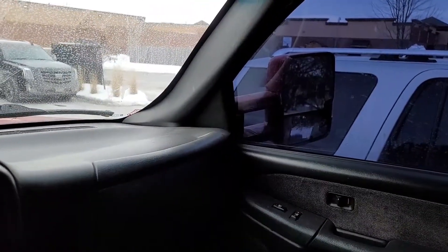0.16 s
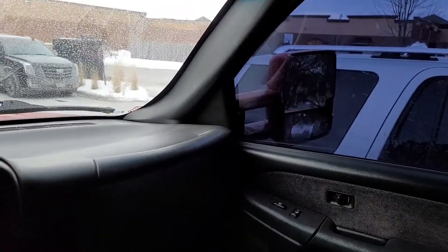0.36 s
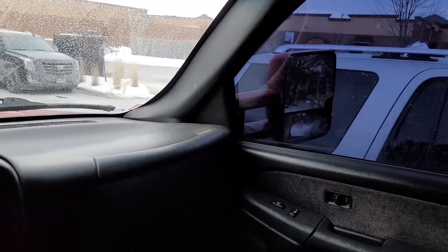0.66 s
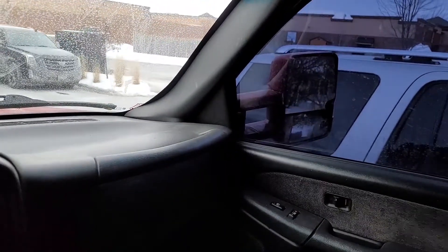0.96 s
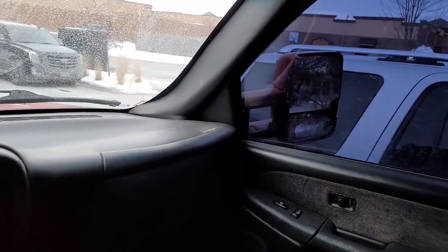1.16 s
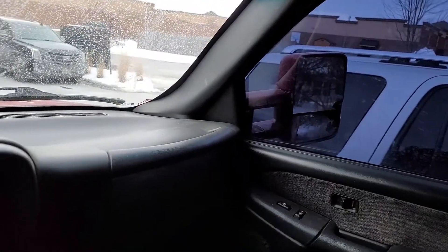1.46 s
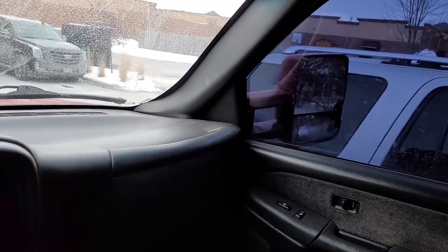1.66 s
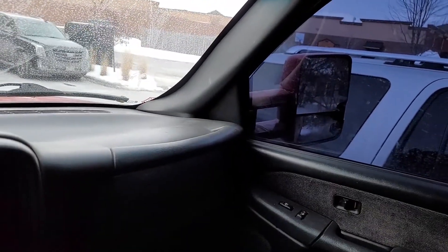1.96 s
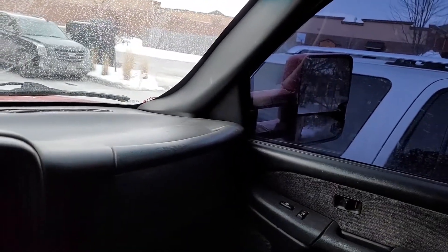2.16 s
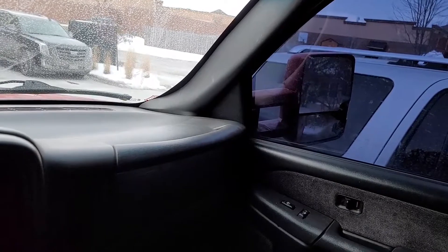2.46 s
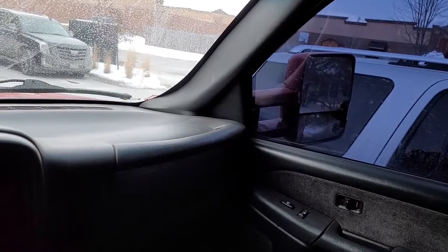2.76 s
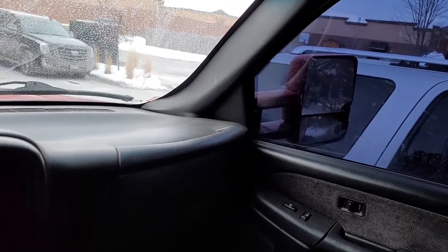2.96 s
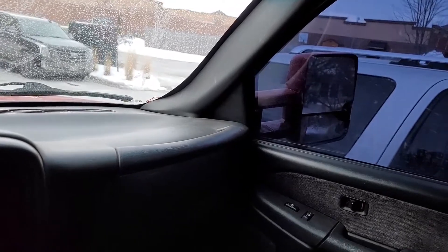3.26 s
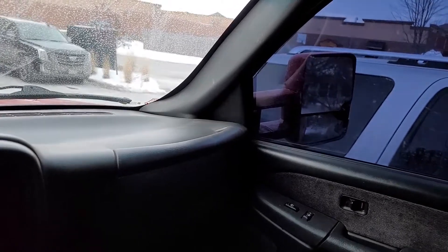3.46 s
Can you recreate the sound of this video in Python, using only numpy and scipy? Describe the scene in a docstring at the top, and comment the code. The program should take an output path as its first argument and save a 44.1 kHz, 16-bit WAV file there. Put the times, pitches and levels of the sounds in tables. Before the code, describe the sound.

A cold diesel truck engine, heard inside the cab, fires with a low boom at 0.2 seconds, then sags until 0.8 with faint chirping squeaks. Uneven thudding bursts follow near 1.0, 1.4, 1.9 and 2.5, with hard knocks, clatter and cab rumble. Another small squeak comes at 2.8. From 3.0 it catches, rising into a stronger, smoother drone; close bright clicks tick around 3.5.

```python
"""A cold diesel engine heard from inside the cab: it fires in stumbling bursts, sags, fires again and at last runs.
Throughout, low sines at orders of the firing rate make the exhaust boom, and noise bursts make the knocks.
Between knocks, noise pulsing with the firing makes the clatter, and slower noise the rumble of floor and cab.
As the engine sags, gliding harmonic tones squeak, with one more late on.
At the end, short bursts of bright noise click close by."""
import sys
import numpy as np
from scipy import signal
from scipy.fft import rfft, irfft, next_fast_len
from scipy.io import wavfile

SR = 44100
rng = np.random.default_rng(int(sys.argv[2]) if len(sys.argv) > 2 else 0)


def put_to_file(sound):
    """Save the sound as 16-bit audio at rate SR, in the file named by the first command-line argument."""
    columns = np.atleast_2d(sound).T  # one column per channel
    safe = np.clip(columns, -1, 1)
    whole_steps = np.round(safe * 32767)
    wavfile.write(sys.argv[1], SR, whole_steps.astype(np.int16))


N = 158760

# Exhaust boom over time: start_s, firing_rate_hz, first_order_db, second_order_db
ENGINE = [(0.0, 31.3, -38.5, -54), (0.1, 32.5, -33, -30.5), (0.2, 39.02, -11, -17), (0.27, 44.1, -16, -24),
          (0.3, 43.4, -18.5, -23), (0.4, 33, -35.5, -33.5), (0.49, 31.41, -40, -32),
          (0.83, 28.52, -42, -45), (0.92, 33.12, -34, -35.5), (1.0, 40.52, -16.5, -12),
          (1.08, 44, -15.5, -25.5), (1.2, 36.86, -31, -41.5), (1.25, 34.02, -32.5, -35),
          (1.4, 35.4, -19.5, -19), (1.44, 35.57, -27, -42.5), (1.63, 32.52, -20.5, -21),
          (1.66, 31.06, -25.5, -41), (1.79, 29.71, -28.5, -35), (1.92, 39.3, -15, -12),
          (1.96, 41.29, -20, -28), (2.05, 45.2, -20, -17), (2.18, 39.3, -32, -35),
          (2.26, 33.49, -22.5, -32), (2.3, 30.8, -17, -36), (2.34, 32.9, -28.5, -51.5),
          (2.46, 40.17, -18, -12.5), (2.55, 39.67, -18.5, -19), (2.6, 39.28, -15, -20),
          (2.71, 52.23, -16, -19), (2.74, 52.3, -18, -34), (2.9, 37, -30.5, -44.5), (3.0, 39.72, -18, -15),
          (3.1, 54.85, -12.5, -16.5), (3.2, 56.96, -8.5, -22), (3.28, 70.13, -12, -18.5),
          (3.52, 67.14, -15.5, -14.5), (3.6, 67.16, -15, -23.5)]
# Further exhaust orders: multiple_of_firing_rate, level_db (against the boom)
EXHAUST_ORDERS = [(0.751, -19), (1.248, -17), (1.753, -21), (2.5, -13.5), (2.998, -16.5)]
UNEVEN_DB, THUD_DB = 4, -1.5  # spread between firings; thudding against the boom; both while rough
SETTLES_HZ, SETTLED_SHARE = 55.6, 0.42  # firing rate midway to even running; roughness left above it
CAB_CUT_HZ = 132.4  # above this the cab no longer booms
# Spectrum of the loose thudding: frequency_hz, density_db (per Hz)
THUD_SPECTRUM = [(13, -41), (22, -17.5), (43, 9.5), (70, 9), (93, -5), (156, -22), (200, -38.5), (260, -46),
                 (440, -120)]

# Hard combustion knocks: start_s, peak_db, ring_db and body_db (both relative to the peak)
KNOCKS = [(0.038, -42.5, -24, 11.5), (0.1415, -29.5, -23, 8), (0.171, -25.5, -24, 3.5),
          (0.1912, -31, -24, 8), (0.2194, -43.5, -25, 16), (0.34, -45.5, -27, 22), (0.386, -46, -33, 14),
          (0.469, -41, -44, 4), (0.7657, -39, -30, 12.5), (0.854, -36.5, -22, 8),
          (0.8936, -40.5, -54, 18.5), (0.93, -31.5, -29, 10), (0.957, -25, -22, 8), (0.988, -26, -24, 6),
          (1.01, -27.5, -23, -13.5), (1.1594, -42, -30, 16.5), (1.2173, -37, -31, 18.5),
          (1.2743, -32, -32, 11), (1.313, -26.5, -24, 4), (1.3413, -29.5, -23, 7.5),
          (1.491, -28.5, -21.5, 3), (1.5384, -33, -28, 16.5), (1.572, -27.5, -25, 4.5),
          (1.737, -35.5, -28, 5), (1.829, -30, -23.5, 6), (1.8568, -35.5, -28.5, 14.5),
          (1.912, -23.5, -21, -1.5), (1.9688, -26.5, -23, 2), (1.998, -31, -25, -1.5),
          (2.1286, -28, -25, 12), (2.21, -29.5, -49, 9), (2.3025, -28, -25, 8.5), (2.352, -50, -38, 24.5),
          (2.385, -33.5, -46, 10.5), (2.4112, -28, -45, 11), (2.468, -34, -22, -12.5),
          (2.515, -32, -39.5, 13), (2.5405, -29, -33.5, -1), (2.5918, -32.5, -21, 10),
          (2.617, -27, -23, 3.5), (2.658, -29, -23.5, 4.5), (2.847, -28.5, -29, 10),
          (2.8903, -29, -30, 10.5), (2.953, -26, -15, 5.5), (2.978, -25, -47, -29), (2.9982, -26, -20.5, 4),
          (3.027, -30.5, -13, 7.5), (3.049, -49, -19, 3), (3.1412, -35.5, -30, -11)]
KNOCK_DB, RING_DB, BODY_DB = -8, -1.5, -2  # noise rms relative to each peak
KNOCK_LEAD_S = 0.006  # the swell starts this long before the knock is heard
KNOCK_HALF_RISE_S, BODY_HALF_RISE_S = 0.004, 0.01  # time to half of the full swell
KNOCK_T60_S, RING_T60_S, BODY_T60_S = 0.22, 0.19, 0.21
# Spectra of block noise, metallic ring and dull body: frequency_hz, density_db (per Hz)
KNOCK_SPECTRUM = [(410, -38), (700, -15.5), (745, -3), (844, -8.5), (1090, -2), (1170, -4.5), (1300, -1),
                  (1520, 0), (1780, -2), (2930, -6), (3100, -5.5), (4030, -29), (6820, -120)]
RING_SPECTRUM = [(3200, -14), (4200, -7), (5200, -8), (5900, -4), (6450, -4), (7000, -3.5), (7600, -16.5),
                 (9500, -23), (11500, -24.5), (15500, -39)]
BODY_SPECTRUM = [(82, -38), (140, 0), (156, -10.5), (199, -1), (247, -8), (282, -4.5), (370, -6.5),
                 (522, -13), (900, -28), (1170, -57), (1980, -120)]

# Modes of firewall and dash: frequency_hz, level_db
PANEL_MODES = [(750, -0.5), (990, -2), (1090, 0), (1290, 1.5), (1530, 0.5), (1700, -7.5), (1910, -1),
               (2190, -7), (2660, -6), (2860, -7), (3030, -9.5)]
# Modes of floor and seats: frequency_hz, level_db
FLOOR_MODES = [(225, -1), (280, -7.5), (332, 3), (420, -2.5), (517, -5.5)]
PANEL_WIDTH_HZ, FLOOR_WIDTH_HZ = 90, 50  # of each of two filter passes
MODE_SWING_DB = 4  # spread of each mode's slow level changes
PANEL_CLATTER_DB, PANEL_KNOCK_DB = -4, -4  # panel ring against clatter and block noise
FLOOR_DB = -6  # against the noise of rumble and knock body

# Turning engine between knocks: start_s, clatter_db, rumble_db, treble_db
TURNING = [(0.0, -53, -41.5, -68), (0.32, -52.5, -35, -70), (0.83, -56.5, -45.5, -84),
           (1.16, -51.5, -35.5, -63), (1.62, -54, -36.5, -71), (2.56, -50, -37, -63.5),
           (2.68, -53.5, -29, -66.5), (2.9, -51, -43, -67), (3.03, -42.5, -30, -58.5),
           (3.6, -46, -31.5, -62)]
CLATTER_PULSE_DB = 1.5  # swing either way with each firing
# Spectra of clatter and its treble: frequency_hz, density_db (per Hz)
CLATTER_SPECTRUM = [(410, -31), (700, 5.5), (900, -4.5), (1500, -3), (2100, -6), (3100, -13.5),
                    (3700, -16.5), (5600, -23.5), (6400, -46), (9000, -87)]
TREBLE_SPECTRUM = [(3000, -23.5), (4200, -6), (6400, -5), (7500, -13), (10000, -25.5), (15500, -39)]
CAB_MODE_HZ, CAB_MODE_WIDTH_HZ, CAB_MODE_DB = 117.3, 86, 4  # level against the rumble

# Squeaks, perhaps a slipping belt: start_s, pitch_hz, level_db (before colour), length_s,
# sag_per_s (share of pitch lost per second)
SQUEAKS = [(0.316, 752, -48.5, 0.058, .2), (0.334, 1870, -47, .04, 0.085), (.395, 1520, -49.5, 0.047, .3),
           (0.368, 2540, -57, 0.035, .1), (0.386, 1930, -45, 0.029, 0.33), (0.397, 2770, -47, 0.033, .2),
           (0.462, 1365, -44, 0.029, 0.4), (.455, 1540, -48.5, 0.065, 0.35), (0.492, 1009, -45, 0.055, .5),
           (.545, 1310, -49, 0.087, 0.87), (0.592, 743, -50, 0.086, 0.077), (0.681, 1218, -49.5, 0.22, 3.1),
           (0.713, 1540, -50, 0.03, 0.28), (0.738, 753, -47.5, 0.068, .2), (0.767, 1374, -48, 0.02, 0.21),
           (2.834, 2660, -46, 0.048, .2)]
# Colour of every harmonic of a squeak: frequency_hz, gain_db
SQUEAK_COLOUR = [(700, 5), (1050, 2), (1350, 2), (2000, -1), (2300, -10), (2700, -2), (3100, -4),
                 (3500, -24), (4200, -28), (5200, -15), (5800, -12), (6500, -45)]
SQUEAK_WAVER_RAD = 0.9  # phase spread of the first harmonic

# Close clicks: start_s, level_db (before rise and decay), half_rise_s, t60_s
CLICKS = [(3.449, -41.5, 0.017, 0.231), (3.482, -28, 0.0046, .06), (3.534, -34, .001, 0.092),
          (3.55, -53, .003, 0.045)]
# Spectrum of the clicks: frequency_hz, density_db (per Hz)
CLICK_SPECTRUM = [(1500, -13.5), (2800, -9), (4200, -8), (5200, -5), (6000, 0), (7000, -9), (8200, -19),
                  (10500, -17), (13500, -23), (15500, -30)]

# Left-right likeness of noise in the cab: frequency_hz, correlation (-1 to 1)
LIKENESS = [(60, .97), (180, .9), (300, .6), (520, -.05), (900, -.55), (1540, -.5), (2650, .0), (6000, .05),
            (12000, .4)]
# Stereo lean: frequency_hz, left_minus_right_db
LEAN = [(60, 3), (200, 0), (600, 2), (1500, 3), (4000, 3.5), (8000, 4), (13000, -1)]
# Lag of left behind right: frequency_hz, phase_rad
LEFT_LAGS = [(20, .33), (80, .4), (125, .25), (220, .13), (500, .1), (900, 0)]
CEILING = 1.05  # full scale of the soft limit
CUTOFF_HZ = 15700  # stopband edge


def from_db(db):
    """Logarithmic level: 20 dB is a factor of ten in amplitude."""
    return 10 ** (np.asarray(db) / 20)


def rms_one(x):
    """Normalisation: division by the root mean square."""
    return x / np.sqrt(np.mean(x ** 2) + 1e-20)


def in_time(rows):
    """Linear interpolation: the columns of a timed table, per sample."""
    s, *columns = np.transpose(rows)
    return [np.interp(np.arange(N) / SR, s, column) for column in columns]


def at_hz(points, hz):
    """Logarithmic frequency: a spectrum read by pitch interval."""
    point_hz, values = np.array(points).T
    return np.interp(np.log(np.maximum(hz, 1)), np.log(np.maximum(point_hz, 1)), values)


def drift(rate_hz):
    """Low-pass random process: white noise through a double pole at rate_hz, spread 1."""
    step = 40  # samples between drawn points
    r = np.exp(-2 * np.pi * step * rate_hz / SR)
    noise = rng.standard_normal(N // step + 2002)
    slow = signal.lfilter([1], [1, -2 * r, r * r], noise)[2000:]
    return np.interp(np.arange(N) / step, np.arange(len(slow)), rms_one(slow))


def side_share(hz):
    """Interchannel correlation: the side-to-mid ratio that gives the cab's likeness."""
    alike = np.clip(at_hz(LIKENESS, hz), -.99, .99)
    return np.sqrt((1 - alike) / (1 + alike))


def coloured(spectrum, peaks=()):
    """Spectral shaping: stereo noise with resonances, likeness and lean; mid rms 1."""
    hz = np.arange(N // 2 + 1) * SR / N
    power = from_db(at_hz(spectrum, hz)) ** 2 * (hz > spectrum[0][0] / 1.5)
    for peak_hz, width_hz, db in peaks:
        detuning = 2 * (hz - peak_hz) / width_hz
        power = power + from_db(db) ** 2 / (1 + detuning ** 2) ** 2
    mid, side = rfft(rng.standard_normal((2, N))) * np.sqrt(power)
    side = side * side_share(hz)
    lean = from_db(at_hz(LEAN, hz) / 2)
    out = irfft([(mid + side) * lean, (mid - side) / lean], N)
    return out / np.sqrt(np.mean(out.mean(axis=0) ** 2))


def bursts(s, db, half_rise_s, t60_s):
    """Exponential decay: bursts swell quickly and die away, their powers adding."""
    power = np.zeros(N)
    for start, level_db, half_rise, t60 in np.broadcast(s, db, half_rise_s, t60_s):
        t = np.arange(N - int(start * SR)) / SR
        swell = np.sin(np.pi / 2 * np.minimum(t / (2 * half_rise), 1)) ** 2
        power[N - len(t):] += (from_db(level_db - 60 * t / t60) * swell) ** 2
    return np.sqrt(power)


def exhaust(firings, rate_hz, first_db, second_db):
    """Periodic excitation: orders of the firing rate, uneven until it settles, over loose thudding."""
    rough = 1 - (1 - SETTLED_SHARE) / (1 + np.exp((SETTLES_HZ - rate_hz) / 2))
    uneven = np.interp(firings, np.arange(300), rng.standard_normal(300))
    both = np.hypot(from_db(first_db), from_db(second_db))
    boom = from_db(first_db) * np.sin(2 * np.pi * firings)
    boom = boom + from_db(second_db) * np.sin(4 * np.pi * firings + 0.8)
    for multiple, db in EXHAUST_ORDERS:
        passes = 1 / (1 + (multiple * rate_hz / CAB_CUT_HZ) ** 12)
        level = both * passes * from_db(db + 4.74 * drift(4.3))
        boom = boom + level * np.sin(2 * np.pi * (multiple * firings + rng.random()))
    boom = np.sqrt(2) * boom * from_db(UNEVEN_DB * uneven * rough)
    sides = from_db(at_hz(LEAN, 60.) * np.array([[.5], [-.5]]))
    return boom * sides + both * rough * from_db(THUD_DB) * coloured(THUD_SPECTRUM)


def knocks(ringing, floor):
    """Impulsive excitation: combustion sets off block and panels, a metallic ring and a dull body."""
    s, db, ring_db, body_db = np.transpose(KNOCKS)
    s = s - KNOCK_LEAD_S
    block = from_db(2.5 * drift(200)) * coloured(KNOCK_SPECTRUM) + from_db(PANEL_KNOCK_DB) * ringing
    block_swell = bursts(s, db + KNOCK_DB, KNOCK_HALF_RISE_S, KNOCK_T60_S)
    ring_swell = bursts(s, db + ring_db + RING_DB, KNOCK_HALF_RISE_S, RING_T60_S)
    body_swell = bursts(s, db + body_db + BODY_DB, BODY_HALF_RISE_S, BODY_T60_S)
    return (block_swell * block + ring_swell * coloured(RING_SPECTRUM)
            + body_swell * (coloured(BODY_SPECTRUM) + floor))


def turning(firings, ringing, floor):
    """Amplitude modulation: valve-gear clatter pulses with firing; rumble excites floor and cab air."""
    clatter_db, rumble_db, treble_db = in_time(TURNING)
    pulse_db = CLATTER_PULSE_DB * np.sin(2 * np.pi * firings) + 1.2 * drift(12)
    cab_air = coloured([(10, -80), (20000, -82.0)], [(CAB_MODE_HZ, CAB_MODE_WIDTH_HZ, 0)])
    clatter = coloured(CLATTER_SPECTRUM) + from_db(PANEL_CLATTER_DB) * ringing
    rumble = coloured(BODY_SPECTRUM) + floor
    return (from_db(clatter_db + pulse_db) * clatter
            + from_db(treble_db + pulse_db) * coloured(TREBLE_SPECTRUM)
            + from_db(rumble_db + 2.0 * drift(4.8)) * rumble
            + from_db(rumble_db + CAB_MODE_DB) * cab_air)


def squeaks():
    """Harmonic series: four wavering harmonics sag together in pitch."""
    out = np.zeros((2, N))
    waver = SQUEAK_WAVER_RAD * np.array([drift(32), drift(32)])
    for s, hz, db, length, sag in SQUEAKS:
        t = np.arange(int(length * SR)) / SR
        at = slice(int(s * SR), int(s * SR) + len(t))
        swell = from_db(db) * np.sin(np.pi * np.sqrt(t / length))
        for k in range(1, 5):
            cycles = k * hz * t * (1 - sag * t / 2) + rng.random((2, 1))
            wave = np.sin(2 * np.pi * cycles + np.sqrt(k) * waver[:, at])
            out[:, at] += swell * from_db(at_hz(SQUEAK_COLOUR, k * hz)) * wave
    return out


def clicks():
    """Transient noise: a small scrape, then bright close clicks."""
    return bursts(*np.transpose(CLICKS)) * coloured(CLICK_SPECTRUM)


def resonances(modes, width_hz):
    """Modal resonance: narrow noise bands, each swelling at its own chance moments; mid rms 1."""
    out = 0
    for hz, db in modes:
        r, w = np.exp(-np.pi * width_hz / SR), 2 * np.pi * hz / SR
        section = [1, 0.0048, -1.0046, 1, -2 * r * np.cos(w), r * r]
        # two passes steepen the skirts
        mid, side = signal.sosfilt([section] * 2, rng.standard_normal((2, N)))
        side = side * side_share(hz)
        out = out + from_db(db + MODE_SWING_DB * drift(19)) * np.array([mid + side, mid - side])
    return out / np.sqrt(np.mean(out.mean(axis=0) ** 2))


def scene():
    """Superposition: every source in the cab adds linearly."""
    rate_hz, first_db, second_db = in_time(ENGINE)
    firings = np.cumsum(rate_hz) / SR  # running count
    ringing = resonances(PANEL_MODES, PANEL_WIDTH_HZ)
    floor = from_db(FLOOR_DB) * resonances(FLOOR_MODES, FLOOR_WIDTH_HZ)
    return (exhaust(firings, rate_hz, first_db, second_db) + knocks(ringing, floor)
            + turning(firings, ringing, floor) + squeaks() + clicks())


def record(dry):
    """Phase lag and saturation: left lags in the bass, peaks are rounded, the top is cut."""
    size = next_fast_len(N + SR)
    hz = np.arange(size // 2 + 1) * SR / size
    left = irfft(rfft(dry[0], size) * np.exp(-1j * at_hz(LEFT_LAGS, hz)), size)[:N]
    rounded = CEILING * np.tanh(np.array([left, dry[1]]) / CEILING)
    return signal.sosfilt(signal.cheby2(12, 70, CUTOFF_HZ, fs=SR, output="sos"), rounded)


dry = scene()
out = record(dry)
put_to_file(out)
```